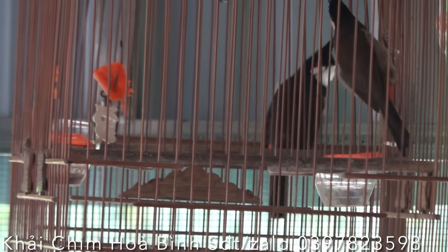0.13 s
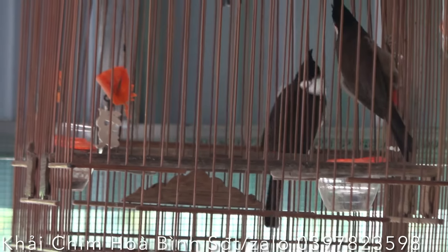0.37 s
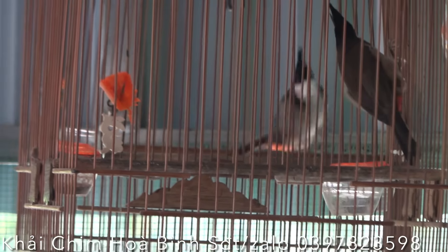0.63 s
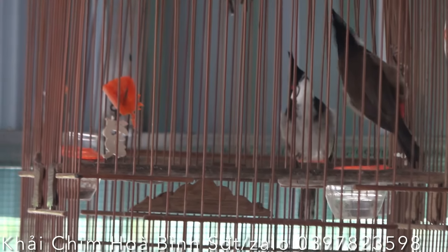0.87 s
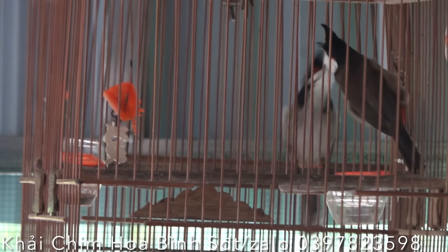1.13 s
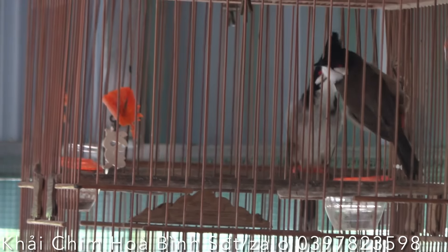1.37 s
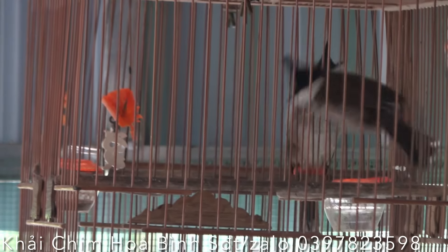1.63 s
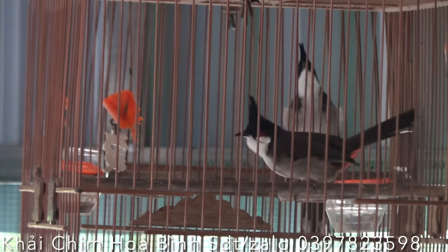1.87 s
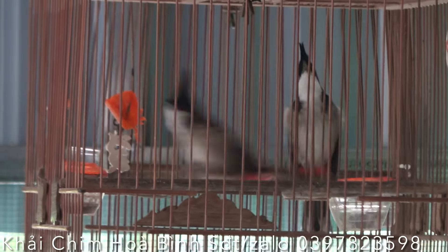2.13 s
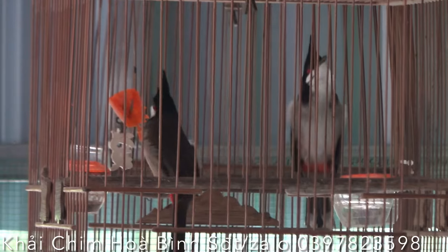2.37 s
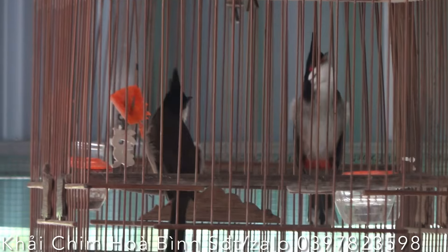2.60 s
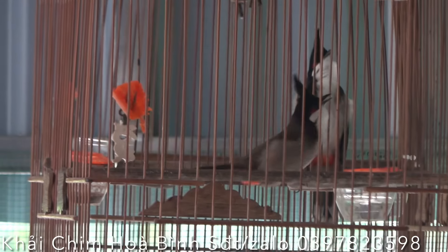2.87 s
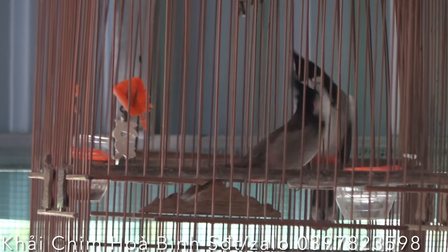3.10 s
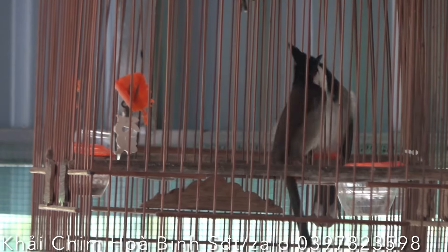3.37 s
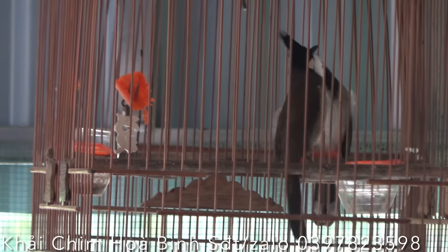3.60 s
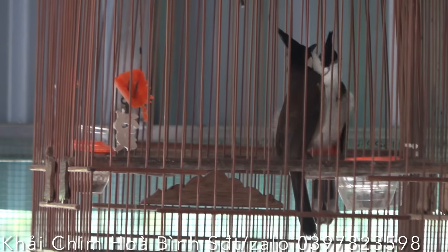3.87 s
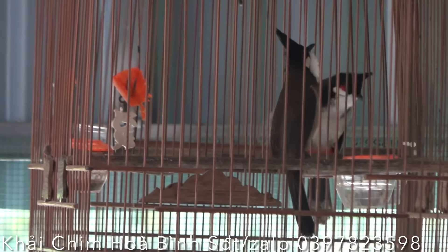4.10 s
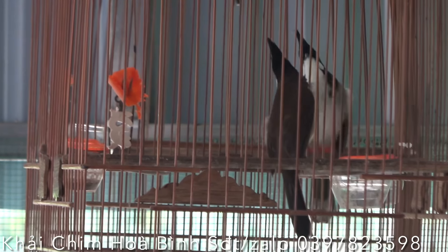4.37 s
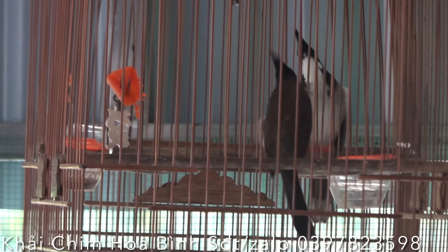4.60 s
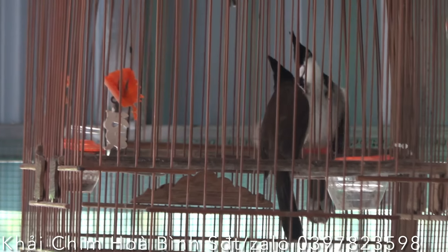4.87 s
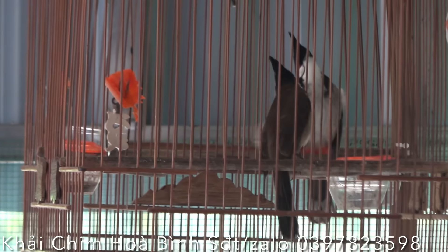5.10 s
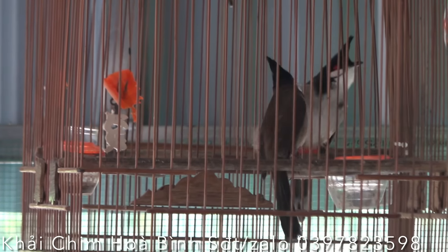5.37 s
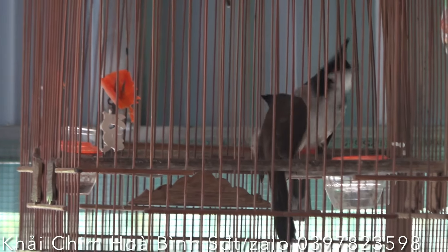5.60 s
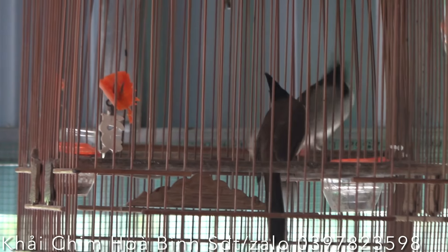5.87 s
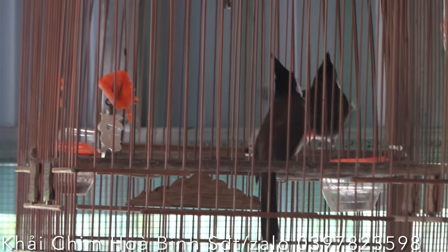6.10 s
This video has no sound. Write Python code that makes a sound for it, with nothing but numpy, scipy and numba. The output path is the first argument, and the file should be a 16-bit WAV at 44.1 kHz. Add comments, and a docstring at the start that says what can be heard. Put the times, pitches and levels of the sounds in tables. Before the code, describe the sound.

Two caged bulbuls chatter in quick bursts of liquid, burry whistles that echo off hard walls, over faint street murmur and a distant idling engine.

```python
"""Caged bulbuls chatter in a hard-walled room: short whistled glides from near and far cages, each a near sine
with faint overtones and a fast throb, ringing on in a dense echo between the walls.
Claws tick on perch and bars in bursts of bright noise. Outside, an engine idles as a train of thuds through
its exhaust, and a soft low hum swells and fades over the street's murmur of filtered noise.
A phone's microphone trims bass and top, and its limiter holds the loudest notes."""
import sys
import numpy as np
from scipy import signal
from scipy.io import wavfile
from scipy.ndimage import uniform_filter1d
from numba import njit

SR = 44100
rng = np.random.default_rng(int(sys.argv[2]) if len(sys.argv) > 2 else 0)


def gain_from_db(level_db):
    """Turn a decibel level (scalar or array-like) into a linear amplitude factor."""
    decades = np.asarray(level_db, float) / 20
    return 10 ** decades


def pcm_store(signal):
    """Save signal as 16-bit PCM."""
    levels = np.round(np.clip(np.atleast_2d(signal), -1, 1) * 32767)
    wavfile.write(sys.argv[1], SR, levels.astype(np.int16).T)


N = 274743
TIME = np.arange(N) / SR
THROAT_HZ = 3350  # the throat's resonance: the voice weakens away from it


def columns(table, t):
    """Every column of a table after the first, joined by straight lines at times t."""
    start_s, *rest = np.transpose(table)
    return [np.interp(t, start_s, column) for column in rest]


def band(x, lo_hz, hi_hz):
    """Band-pass."""
    return signal.sosfilt(signal.butter(2, [lo_hz, min(hi_hz, .45 * SR)], "bandpass", fs=SR, output="sos"), x)


def unit(x):
    """Scale to rms 1."""
    return x / np.sqrt(np.mean(x ** 2))


def walk(rate_hz):
    """Random levels held 1 / rate_hz seconds and slewed twice; spread near 1."""
    hold = int(SR / rate_hz)
    steps = np.repeat(rng.standard_normal(N // hold + 1), hold)
    return unit(uniform_filter1d(uniform_filter1d(steps, hold), hold)[:N])


def birds(direct_db=-5.5, far_db=-35.0, thinning=0.38):
    """Steady whistles, husky chirps and rasps; quiet notes come from far cages, so mostly their echo arrives."""
    # notes, levels at the bird before the room: start_s, length_s, from_hz, to_hz, level_db
    whistles = [(1.275, 0.038, 2840, 2870, -16), (1.395, 0.0394, 3750, 3620, -28.5),
                (1.645, .045, 3044, 3144, -10), (1.775, 0.055, 3275, 3450, -10),
                (1.887, .022, 2796, 2778, -6.5), (1.905, 0.0175, 2720, 1330, -14.5),
                (1.922, .04, 3030, 2930, -9.5), (2.018, .075, 1282, 2066, -19.5),
                (2.105, 0.026, 1900, 1670, -23), (2.14, 0.0269, 2316, 3070, -9),
                (2.167, 0.023, 3253, 3325, -7), (2.5, 0.021, 3270, 3324, -20),
                (2.58, 0.044, 3036, 2867, -18.5), (2.89, 0.0717, 1900, 1475, -25),
                (4.015, 0.0787, 1730, 3505, -19.5), (4.565, .045, 3084, 2995, -14)]  # clear
    chirps = [(0., .022, 1720, 1780, -49), (.025, 0.046, 2680, 2990, -32.5), (.06, 0.03, 2265, 2304, -34),
              (.25, .05, 1990, 2450, -47), (.295, .05, 2500, 2800, -42.5), (.35, .04, 1550, 1480, -50),
              (.49, 0.023, 1520, 1480, -44), (.5, 0.018, 2900, 3010, -50.5),
              (.61, 0.031, 1735, 1560, -48.5), (.76, 0.032, 1500, 2030, -47.5),
              (.79, 0.066, 2000, 2650, -37), (.88, 0.099, 2485, 2440, -36.5), (.905, .05, 3510, 3324, -33),
              (.98, 0.029, 4600, 4500, -38), (1.06, .04, 2900, 2500, -31), (.985, 0.037, 3896, 3578, -24),
              (1.05, 0.057, 3300, 3066, -31.5), (1.015, .04, 3120, 2750, -30),
              (1.1, 0.063, 2370, 3705, -24), (1.15, .055, 3430, 2600, -21.5),
              (1.13, 0.025, 4000, 4500, -37), (1.225, .06, 3950, 3400, -26), (1.235, .02, 4400, 4500, -40),
              (1.24, .04, 2610, 1990, -20), (1.262, 0.051, 1997, 1770, -24.5),
              (1.33, 0.055, 2013, 1930, -31.5), (1.385, 0.027, 1917, 2310, -37),
              (1.455, 0.041, 1300, 2824, -16.5), (1.482, 0.06, 2888, 3580, -10),
              (1.525, 0.023, 3590, 4000, -14.5), (1.55, 0.06, 3900, 3020, -33),
              (1.728, 0.033, 2100, 2429, -13.5), (1.755, 0.034, 2385, 3030, -15),
              (1.96, 0.05, 1474, 2347, -22), (2.02, 0.041, 2360, 2405, -17), (2.32, 0.075, 3151, 3003, -13),
              (2.36, 0.075, 1702, 2424, -24), (2.43, 0.086, 2443, 2384, -18),
              (2.475, 0.032, 1480, 1710, -43), (2.615, 0.015, 3215, 3990, -17),
              (2.632, 0.018, 3940, 3470, -19), (2.71, 0.017, 3560, 2950, -17.5),
              (2.73, 0.036, 2884, 2540, -19.5), (2.755, 0.074, 1700, 2457, -26.5),
              (2.85, 0.05, 1870, 1940, -30), (3.15, 0.094, 2155, 3657, -39),
              (3.18, 0.032, 1800, 1800, -48.5), (3.21, 0.041, 1910, 2085, -47),
              (3.19, 0.028, 4720, 3950, -49), (3.255, 0.041, 1495, 1660, -45),
              (3.31, .11, 1800, 2730, -40.5), (3.355, 0.052, 2990, 3154, -40.5),
              (3.42, 0.11, 2660, 2590, -36.5), (3.485, 0.028, 1830, 1815, -44),
              (3.505, 0.034, 1950, 2200, -43), (3.645, 0.13, 2200, 2243, -42.5),
              (3.69, 0.017, 2805, 2960, -34.5), (3.71, 0.098, 2800, 2548, -35.5),
              (4.16, 0.073, 1860, 3210, -21), (4.225, 0.022, 3200, 3040, -24),
              (4.325, .026, 2700, 1150, -17), (4.273, .025, 2900, 3050, -14),
              (4.4, 0.038, 1890, 2760, -16.5), (4.43, 0.043, 2750, 3100, -9.5),
              (4.465, 0.061, 3068, 2880, -16), (4.505, 0.048, 3060, 3494, -20),
              (4.53, 0.024, 4430, 3600, -28), (4.835, .03, 1880, 2750, -26), (4.858, .05, 2750, 3070, -21),
              (4.905, 0.034, 3120, 3680, -21), (4.94, 0.053, 3650, 3450, -24.5),
              (4.975, 0.057, 3448, 3200, -18.5), (5.025, 0.071, 2347, 2560, -19.5),
              (5.265, 0.031, 3020, 3100, -41), (5.478, .045, 1950, 3600, -13),
              (5.515, .055, 3650, 3900, -14), (5.682, .03, 1950, 2600, -24), (5.703, .05, 2550, 3650, -14),
              (5.745, .085, 3600, 3000, -16), (5.98, 0.034, 1760, 1584, -44),
              (6.06, 0.027, 1670, 1750, -49), (6.11, 0.031, 1950, 1530, -38),
              (6.19, 0.022, 2900, 2850, -48)]  # burry
    rasps = [(1.628, 0.016, 1650, 2220, -26), (1.74, .025, 1390, 3850, -27),
             (1.98, 0.13, 3320, 3740, -36.5), (2.2, 0.0247, 3480, 4166, -13.5),
             (2.22, .055, 4044, 3450, -17.5), (4.283, 0.0258, 3080, 3800, -14),
             (4.3, 0.033, 3735, 4200, -27), (4.32, 0.047, 3950, 3490, -20.5), (4.7, 0.028, 2060, 2730, -37),
             (4.718, .04, 2766, 4600, -22), (4.735, .04, 4200, 2880, -22)]  # harsh
    song = sing(whistles, -29.5, waver=0.011, burr=0.11)
    song = song + sing(chirps, -25.5, waver=0.028, burr=0.65)
    song = song + sing(rasps, -22.5, waver=0.035, burr=0.8)
    loudness = np.sqrt(uniform_filter1d(song ** 2, size=1300) + 1e-12)
    nearness = np.minimum(1, loudness / gain_from_db(far_db)) ** thinning
    return room(song, song * gain_from_db(direct_db) * nearness)


def sing(notes, over_db, waver, burr, burr_hz=210.7, strain=0.057, far_dull=0.076):
    """Each note is a near sine with faint overtones; an uneven fast throb shakes its level and pitch."""
    # overtones before the emphasis near 11.5 kHz shapes them: multiple of the pitch, level_db
    partials = [(2, 4.5), (3, 2.5), (4, -4), (5, 6), (6, 4)]
    # overtones come out best near 11.5 kHz and fall away on either side; higher notes are brighter
    peak_hz, under_db_per_oct, over_db_per_oct, bright_db_per_oct = 11500, 7, 30, 9.5
    throb = 2 * np.pi * np.cumsum(burr_hz * (1 + .25 * walk(80))) / SR
    tremble = 1 + waver * (np.cos(throb) + walk(250))
    flutter = (1 + np.clip(burr, 0, 1) * np.sin(throb)) * gain_from_db(6 * burr * walk(120))
    air = gain_from_db(-8.5) * unit(band(rng.standard_normal(N), 5200, 12500))
    out = np.zeros(N)
    for start_s, length_s, from_hz, to_hz, level_db in notes:
        i = np.arange(int(start_s * SR), min(int((start_s + length_s) * SR), N))
        hz, db = shape(np.linspace(0, 1, len(i)), from_hz, to_hz)
        hz = hz * tremble[i]
        phase = 2 * np.pi * np.cumsum(hz) / SR
        overtones = 0
        for k, partial_db in partials:
            octaves = np.log2(k * hz / peak_hz)
            peak_db = np.where(octaves < 0, under_db_per_oct, -over_db_per_oct) * octaves
            audible = k * hz < .4 * SR
            overtones = overtones + gain_from_db(partial_db + peak_db) * np.sin(k * phase) * audible
        # 7 ms ramps at both ends, meeting in the middle of shorter notes
        edge = np.sin(np.pi / 2 * np.clip(np.minimum(i - i[0], i[-1] - i) / (.007 * SR), 0, 1)) ** 2
        # overtones and hiss come out as the bird sings harder, and are duller from far cages
        bright_db = over_db + strain * db + far_dull * level_db + bright_db_per_oct * np.log2(hz / THROAT_HZ)
        voice = np.sqrt(2) * np.sin(phase) + gain_from_db(bright_db) * (overtones + air[i])
        out[i] += voice * gain_from_db(level_db + db) * edge * flutter[i]
    return out


def shape(u, from_hz, to_hz):
    """Pitch slides fast, then settles; level follows the throat's resonance, swells and fades. u runs 0-1."""
    below_db_per_oct, above_db_per_oct = 25, 21
    fade_db, fade_late = 12, 3.34  # loss by the note's end; the higher the power, the later it comes
    swell_db_per_oct = 3  # a rising note is fainter the further it still has to climb
    share = .27 if to_hz > from_hz else 0.604  # time constant of the slide up or down, as part of the note
    hz = from_hz + (to_hz - from_hz) * (1 - np.exp(-u / share)) / (1 - np.exp(-1 / share))
    octaves = np.log2(hz / THROAT_HZ)
    db = np.where(octaves < 0, below_db_per_oct * octaves, -above_db_per_oct * octaves)
    db = db - fade_db * u ** fade_late
    db = db - swell_db_per_oct * np.maximum(np.log2(to_hz / hz), 0)
    return hz, db - db.max()


def room(x, near, echo_db=0., build_s=0.0012, knee_s=0.1):
    """Direct sound plus a dense noise tail that builds quickly and thins once the near walls have answered."""
    # octave bands of the tail, decay before the thinning: centre_hz, t60_s
    decay = [(1500, 0.5), (3000, 0.37), (6000, 0.41), (12000, 0.45)]
    t, tail = np.arange(SR // 2) / SR, 0
    for hz, t60_s in decay:
        noise = unit(band(rng.standard_normal(len(t)), hz / np.sqrt(2), hz * np.sqrt(2)))
        tail = tail + np.sqrt(hz) * noise * gain_from_db(-60 * t / t60_s)
    thinning_db = -9 * (1 + np.tanh((t - knee_s) / 0.071)) / 2
    tail = tail * (1 - np.exp(-t / build_s)) * gain_from_db(thinning_db)
    # the echo's strength is set by its energy around the birds' pitch
    tail = tail / np.sqrt(np.sum(band(tail, 2320, 3620) ** 2) * SR / 4000)
    return near + gain_from_db(echo_db) * signal.fftconvolve(x, tail)[:N]


def ticks(ring_s=0.0066):
    """A claw on perch or bars gives a short dry burst of bright noise, dying away exponentially."""
    # taps, levels of the burst before its filter: start_s, level_db
    taps = [(0.159, -38.5), (0.336, -46.5), (0.5387, -47), (3.8796, -45.5), (3.9804, -41.5),
            (5.1353, -34.5), (5.3627, -44.5), (5.9764, -34)]
    out, t = np.zeros(N), np.arange(1000) / SR
    for start_s, level_db in taps:
        i = int(start_s * SR)
        burst = rng.standard_normal(len(t)) * np.exp(-t / ring_s)
        out[i:i + len(t)] += gain_from_db(level_db) * band(burst, 2900, 11600)
    return out


def engine(firing_hz=21.7, scatter_db=2.0):
    """One thud a firing, slightly uneven in strength, ringing the exhaust."""
    # idling outside: start_s, level_db
    idle = [(0, -53.5), (.9, -55), (2.3, -57.5), (3.1, -51.5), (4.1, -49.5), (4.7, -52), (5.4, -39.5),
            (5.9, -45), (6.23, -43)]
    # exhaust resonances, levels relative to each other: centre_hz, width_hz, level_db
    exhaust = [(98.5, 13, -1), (202.1, 23, 2), (276.6, 37, 1), (814, 100, -17.5)]
    fired = np.arange(0, N, SR / firing_hz).astype(int)
    pulses = np.zeros(N)
    pulses[fired] = gain_from_db(scatter_db * rng.standard_normal(len(fired)))
    pipe = 0
    for hz, width_hz, ring_db in exhaust:
        pipe = pipe + gain_from_db(ring_db) * unit(band(pulses, hz - width_hz / 2, hz + width_hz / 2))
    level_db, = columns(idle, TIME)
    return gain_from_db(level_db) * unit(pipe)


def hum(under_db=-5.0):
    """A soft low tone with its lower octave, swelling and fading."""
    # upper tone: start_s, pitch_hz, level_db
    swell = [(0, 160.6, -74), (.6, 163.2, -59), (.75, 166.2, -47), (1.1, 173.4, -43.5), (1.22, 178.2, -54),
             (1.3, 174.8, -45), (1.45, 173.5, -50.5), (1.6, 171.8, -82.5), (2, 168, -84)]
    hz, level_db = columns(swell, TIME)
    phase = 2 * np.pi * np.cumsum(hz) / SR
    return np.sqrt(2) * gain_from_db(level_db) * (np.sin(phase) + gain_from_db(under_db) * np.sin(phase / 2))


def street(flicker_db=2.2):
    """Half-octave bands of murmur that flicker alone, and the hiss of tyres going by."""
    # murmur's spectrum, only its shape matters: pitch_hz, level_db per Hz
    murmur = [(18, -36), (30, -5.5), (88, -0.5), (270, -10.5), (479, -19.5), (787, -17.5), (1230, -23),
              (1590, -10.5), (2300, -27.5), (3150, -24), (12300, -41.5), (15500, -54)]
    # traffic: start_s, murmur_db, tyres_db
    traffic = [(0, -44.5, -60), (.8, -43.5, -64), (1.5, -42, -61), (2.3, -45.5, -62), (3.1, -42.5, -59),
               (4, -46, -58), (4.5, -44, -62), (4.9, -40.5, -49), (5.4, -40.5, -49.5), (5.8, -43.5, -74),
               (6.23, -45, -49.5)]
    hz, density_db = np.transpose(murmur)
    out = 0
    for f in 30 * 2 ** np.arange(0, 9.1, .5):
        noise = unit(band(rng.standard_normal(N), f / 2 ** .25, f * 2 ** .25))
        band_db = np.interp(np.log(f), np.log(hz), density_db) + flicker_db * walk(6)
        out = out + np.sqrt(f) * gain_from_db(band_db) * noise  # a band's width grows with f
    murmur_db, tyres_db = columns(traffic, TIME)
    tyres = unit(band(rng.standard_normal(N), 613, 1110))
    return gain_from_db(murmur_db) * unit(out) + gain_from_db(tyres_db) * tyres


def scene():
    """Birds and claws sound through the room; the street comes from outside."""
    claws = ticks()
    indoors = birds() + room(claws, claws, echo_db=-4.5)
    outdoors = engine() + hum() + street()
    return (indoors + outdoors)[None]


@njit
def follow(x, attack, release):
    """Peak level that rises fast and falls slowly; attack and release are shares per sample."""
    level, out = 0., np.empty(len(x))
    for i in range(len(x)):
        level += (abs(x[i]) - level) * (attack if abs(x[i]) > level else release)
        out[i] = level
    return out


def top_cut(x):
    """Nothing passes above the cut-off."""
    return signal.sosfilt(signal.butter(12, 15750, fs=SR, output="sos"), x)


def record(dry, ceiling=0.42, attack_s=0.00015, release_s=0.013, squeeze=0.87, low_hz=38.2, top_hz=15600.0):
    """The microphone drops the deepest bass and the top; a limiter that looks a little ahead holds the peaks."""
    heard = signal.sosfilt(signal.butter(2, [low_hz, top_hz], "bandpass", fs=SR, output="sos"), dry)
    peak = follow(heard[0], 1 / (attack_s * SR), 1 / (release_s * SR))
    peak = np.roll(peak, -int(attack_s * SR))  # look ahead
    gain = uniform_filter1d(np.minimum(1, ceiling / (peak + 1e-9)) ** squeeze, size=40)
    return top_cut(heard * gain)


dry = scene()
out = record(dry)
pcm_store(out)
```